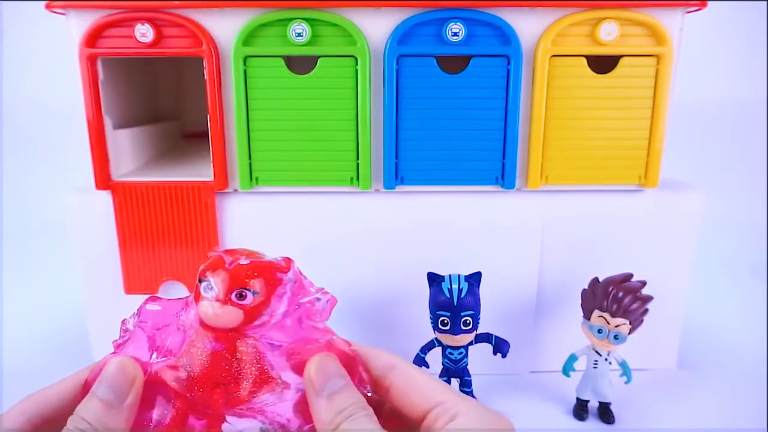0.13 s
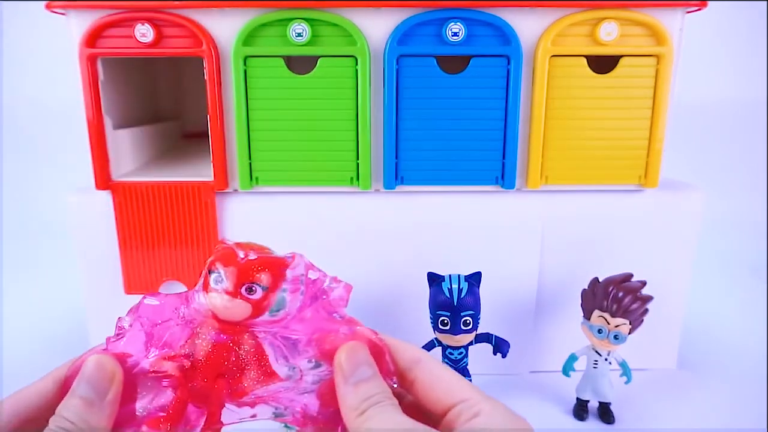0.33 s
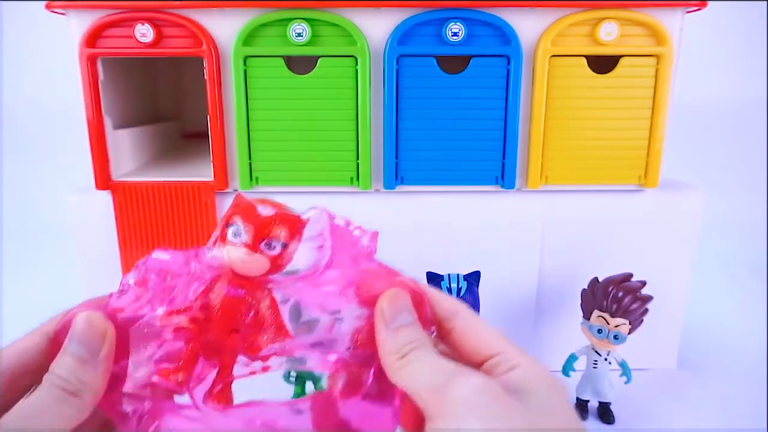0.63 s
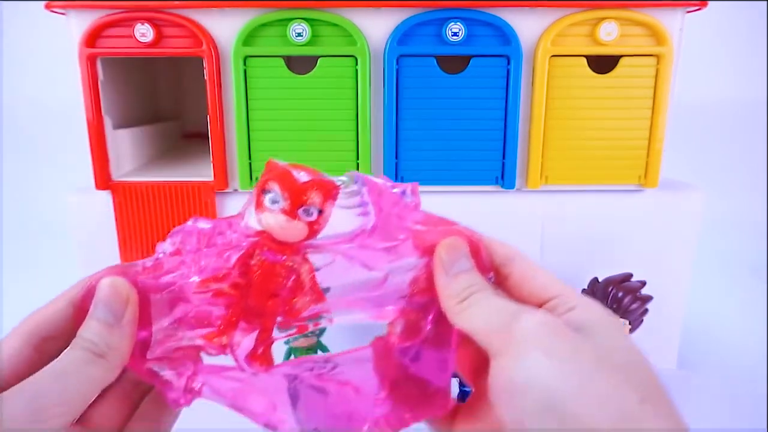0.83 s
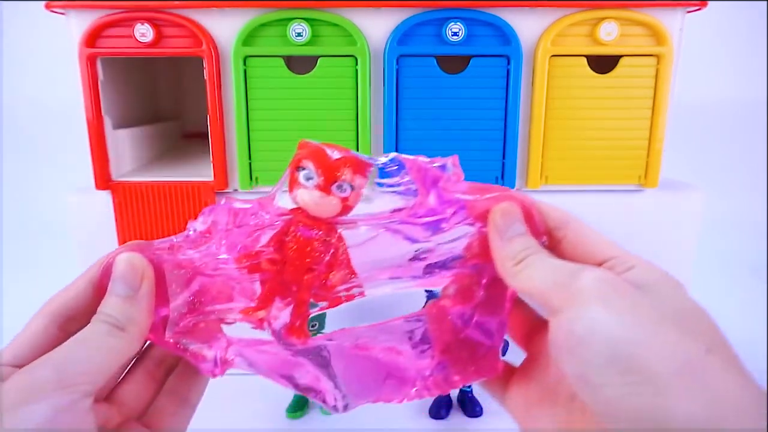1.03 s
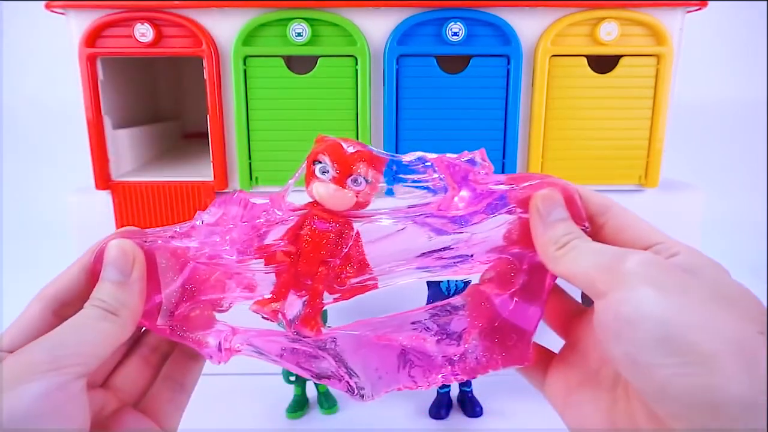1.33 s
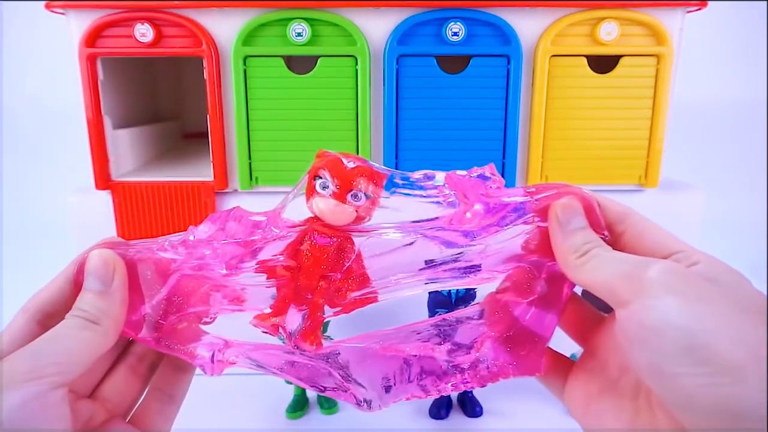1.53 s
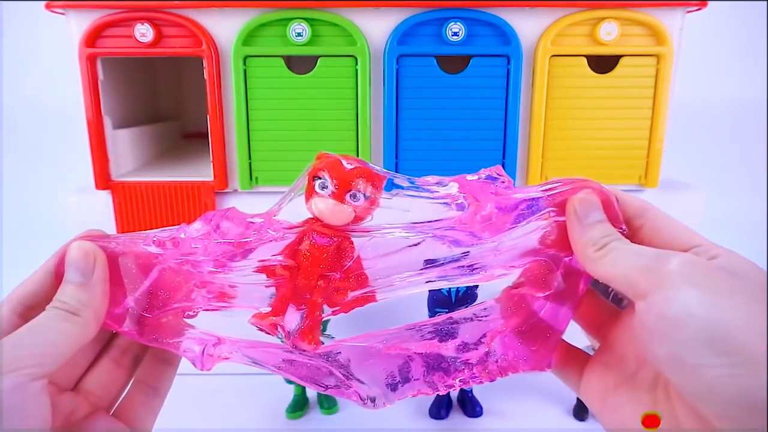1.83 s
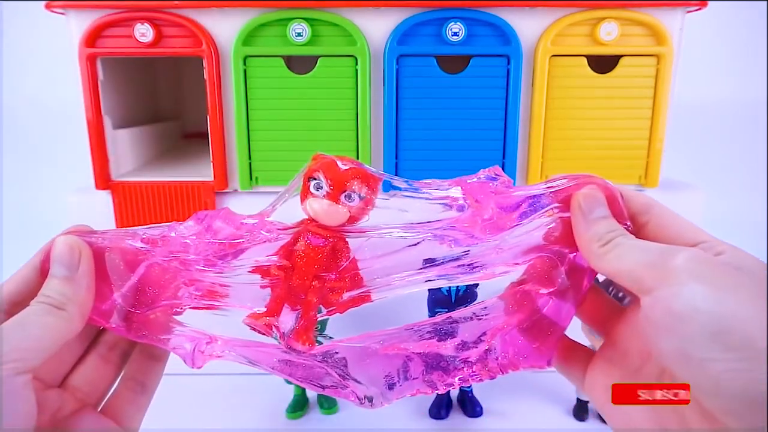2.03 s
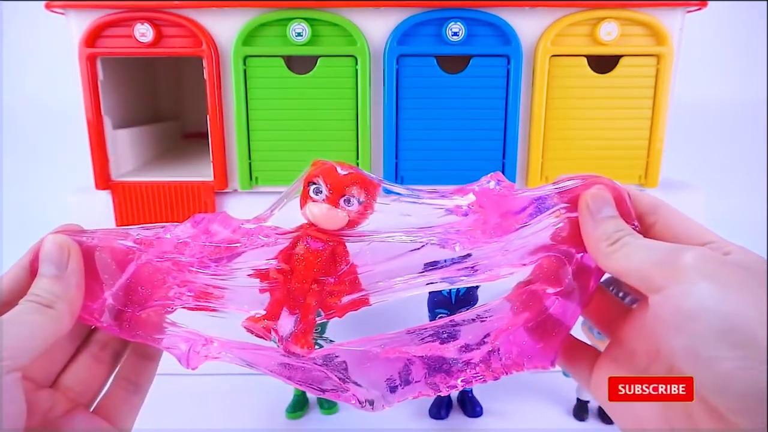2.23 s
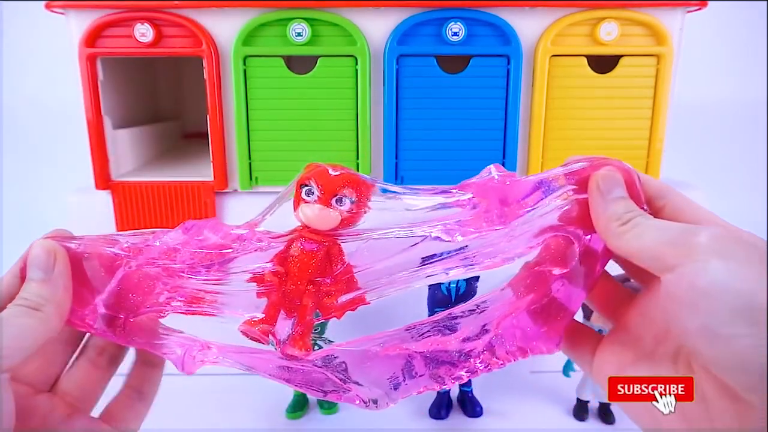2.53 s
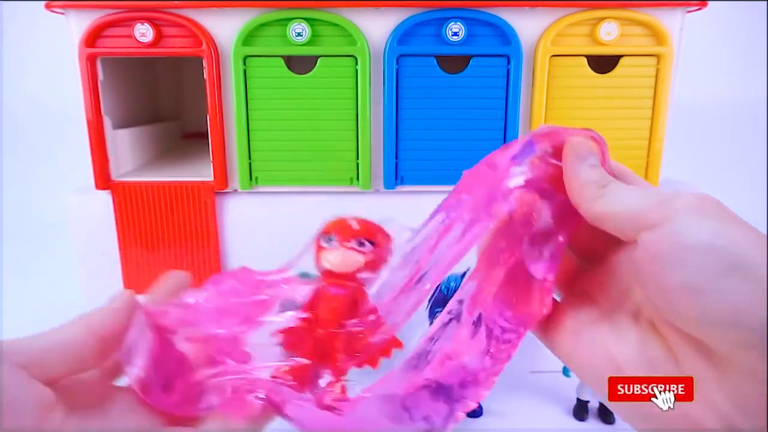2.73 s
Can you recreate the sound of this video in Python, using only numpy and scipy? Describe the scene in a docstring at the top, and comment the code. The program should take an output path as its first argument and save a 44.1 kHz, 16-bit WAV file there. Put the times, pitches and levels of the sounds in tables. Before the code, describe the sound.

Sticky slime squeezed and stretched by hand, with wet crackles, pops and squelches.

```python
"""Hands squeeze and stretch sticky slime close to a stereo microphone, in a quiet room that rumbles and
throbs below hearing. First thin films snap, trapped air hisses out through wet slits and fingers come
unstuck with tiny puffs. Then air pockets burst with a plop and the slime squelches, hardest near 1.4 s.
The sound drops out for a tenth of a second at 1.66 s. More squelching and plops follow, then a thin
whistle and the last snaps and hisses. The loudest pops clip."""
import sys
import numpy as np
from scipy import signal
from scipy.fft import rfft, irfft, next_fast_len
from scipy.io import wavfile
from scipy.ndimage import map_coordinates

SR = 44100
rng = np.random.default_rng(int(sys.argv[2]) if len(sys.argv) > 2 else 0)


def inscribe(sig):
    """Save sig as 16-bit PCM at rate SR to the path in sys.argv[1].

    A 1-D sig is mono; a 2-D sig holds one channel per row.
    Samples are clipped to [-1, 1] before scaling.
    """
    pcm = np.round(np.clip(np.atleast_2d(sig).T, -1, 1) * 32767)
    wavfile.write(sys.argv[1], SR, pcm.astype(np.int16))


N = 127890
TIME = np.arange(N) / SR
SHORT_TIME = TIME[:SR // 4]  # a quarter-second clock for single short sounds


def amp(db):
    """Turn decibels into a number to multiply by."""
    return 10 ** (np.asarray(db) / 20)


def unit(x):
    """Scale a sound to an average (rms) strength of 1."""
    return x / np.sqrt(np.mean(x ** 2) + 1e-20)


def along(points, hz):
    """Read between (frequency, value) points on a log frequency scale."""
    f, values = np.transpose(points)
    return np.interp(np.log(hz + 1), np.log(f + 1), values)


def curves(rows):
    """Join timed rows with straight lines, a curve per column; outside them -120 (silence in dB)."""
    times, *columns = np.transpose(rows)
    return [np.interp(TIME, times, column, -120, -120) for column in columns]


def wobble(rate):
    """A smooth curve through `rate` random values a second."""
    return map_coordinates(rng.standard_normal(int(N * rate / SR) + 4), [TIME * rate])


def filtered(x, response):
    """Multiply each frequency f in a sound by response(f)."""
    size = next_fast_len(x.shape[-1] + 8192)
    return irfft(rfft(x, size) * response(np.fft.rfftfreq(size, 1 / SR)), size)[..., :x.shape[-1]]


def ringing(f, rings):
    """How something that rings answers frequency f; each ring is (f/Hz, width/Hz, level/dB)."""
    return sum((-1) ** k * amp(db) * 1j * f * width / (hz * hz - f * f + 1j * f * width)
               for k, (hz, width, db) in enumerate(rings))


def noise(colour, likeness):
    """Stereo noise shaped by colour(f); likeness rows are (f/Hz, 0 to 1), where 1 makes left = right."""
    def response(f):
        angle = np.arccos(along(likeness, f)) / 2
        return colour(f) * [np.cos(angle), np.sin(angle)]
    mid, side = filtered(rng.standard_normal((2, N)), response)
    return unit(np.array([mid + side, mid - side]))


def add(out, start, sound, pan_db=0):
    """Mix a sound in at `start` seconds, pan_db louder on the left than on the right."""
    place = out[:, round(start * SR):][:, :sound.shape[-1]]
    place += amp([[pan_db / 2], [-pan_db / 2]]) * sound[..., :place.shape[-1]]


# The room's noise, from bass to treble: f/Hz, relative level/dB
ROOM_COLOUR = [(12, -29), (20, -0.5), (120, -16.5), (248, -23.5), (422, -27), (738, -31.5), (2320, -42),
               (5530, -45.5), (16000, -52)]
# How alike that noise is left and right: f/Hz, likeness/0 to 1
ROOM_LIKENESS = [(60, 0.19), (240, 0.18), (950, 0.23), (3770, 0.22), (15000, 0.11)]
# Faint high tones: f/Hz, level/dB
ROOM_TONES = [(5733, -69.5), (7644, -67)]

def room():
    """The room rumbles and hisses softly, with a sway too low to hear and two wavering tones."""
    rumble = noise(lambda f: amp(along(ROOM_COLOUR, f)) * (f > 20), ROOM_LIKENESS)
    sway = noise(lambda f: (f > 4) * (f < 20), [(10, 0.19)])
    tones = sum(amp(db + 3.8 * wobble(21)) * np.sin(2 * np.pi * hz * TIME) for hz, db in ROOM_TONES)
    return amp(-34) * rumble + amp(-38) * sway + tones


# Snapping films: t/s, peak level/dB, main ring f/Hz, other rings' gain/dB, time to fade 60 dB/s
FILM_SNAPS = [(0.0518, -6.5, 15400, -15.5, 0.0051), (0.088, -8.5, 3620, -17.5, 0.0039),
              (0.131, -21, 15900, -2, 0.005), (0.199, -22.5, 3400, -27, 0.0065),
              (0.2198, -5, 3450, -31.5, 0.0065), (0.351, -19, 12200, -13.5, 0.0065),
              (0.3743, -13, 3410, -20, 0.0071), (0.5365, -20, 3270, -13.5, 0.0089),
              (0.5535, -26, 3300, 6, 0.0041), (0.5692, -22.5, 3320.0, -20, 0.0071),
              (0.627, -15, 8100, -9, 0.011), (0.6323, -15.5, 3930, -3, 0.0076),
              (0.6539, -22, 9700, -24, 0.0094), (0.6605, -13, 9360, -21.5, 0.006),
              (0.6616, -17.5, 3140, -21, 0.0094), (0.7044, -16.5, 4370, -19, 0.0078),
              (0.7106, -15.5, 9700, -18, 0.0095), (0.757, -18.5, 9700, -30, 0.011),
              (0.7794, -7, 3270, -17.5, 0.028), (0.827, -23, 6600, -10, 0.007),
              (0.848, -10.5, 3270, -22, 0.015), (0.857, -18, 6500, -13, 0.007),
              (0.8779, -2.5, 8360, -27.5, 0.0094), (0.8956, -5, 10700, 6, 0.0081),
              (0.938, -22, 9730.0, 4, 0.0065), (0.957, -14, 13000, -7, 0.0077),
              (0.9673, -4, 6230, -1.5, 0.0058), (0.974, -7.5, 4000, -7, 0.0054),
              (0.9816, -4, 8500, -8, 0.01), (1.0107, -10.5, 4070, -9, 0.0065),
              (1.0326, -14, 4420, -15, 0.0036), (1.05, -20.5, 11000, -11, 0.0065),
              (1.0572, -11, 4330, -2, 0.0086), (1.0656, -10.5, 5750, 1, 0.0072),
              (1.0698, -7.5, 4230, 8.5, 0.0089), (1.1073, -8, 7100, -11.5, 0.0054),
              (1.1181, -7, 9350, -9.5, 0.0085), (1.1276, -18, 6030.0, 8.5, 0.0065),
              (1.1464, -1, 9850, 0, 0.0069), (1.155, -6.5, 9700, -2.5, 0.0058),
              (1.174, -4.5, 4400, -8.5, 0.0065), (1.1808, -16, 9250, -4.5, 0.0065),
              (1.202, 0, 5850, -7, 0.0038), (1.213, -13, 9700, 2, 0.0065),
              (1.2297, -8.5, 4150, -18, 0.0065), (1.235, -15, 4550, -11, 0.011),
              (1.2426, -15, 9500, -21, 0.0065), (1.255, -8, 8700, -12, 0.0075),
              (1.2639, 0.5, 8400, 2.5, 0.0071), (1.278, -16.5, 9400, -10, 0.0065),
              (1.2855, -1, 8700, -10.5, 0.0065), (1.2905, 2, 8870, -30, 0.0044),
              (1.319, 0.5, 11400, -16.5, 0.0057), (1.3304, -3.5, 7030, -4, 0.013),
              (1.3379, -1, 7230, -8, 0.0097), (1.345, -6.5, 6750, -5, 0.0065),
              (1.363, -9.5, 5610, -7, 0.0049), (1.4, -9, 11370.0, -7.5, 0.0065),
              (1.4225, -1.5, 11710.0, -4, 0.0065), (1.455, -13, 11530, -13.5, 0.0097),
              (1.4595, -10.5, 14510.0, -0.5, 0.0065), (1.4919, -6, 10600, -1, 0.0059),
              (1.498, -4.5, 4160, -12, 0.017), (2.0108, 2.5, 4460, -18, 0.0079),
              (2.054, -12, 2610, -24.5, 0.0057), (2.1888, -12.5, 10100, 5.5, 0.0053),
              (2.1915, -12, 5160, -11, 0.0079), (2.283, -27, 10600, -3, 0.0058),
              (2.37, -29, 3700, -16, 0.0038), (2.402, -35, 5800, -12.5, 0.005),
              (2.417, -16, 6740, -6.5, 0.005), (2.4314, -23, 14990.0, -11, 0.0065),
              (2.4482, -14, 14300, -11, 0.0054), (2.452, -2, 8380, -14.5, 0.0052),
              (2.4748, -27, 2680, -14, 0.0055), (2.479, -18, 10000, -13, 0.007),
              (2.484, 0.5, 9550, -14.5, 0.0088), (2.4898, -6.5, 3460, 1, 0.0065),
              (2.5173, -15, 10400, -3, 0.0052), (2.55, -21, 11630.0, -2.5, 0.007),
              (2.5734, -6, 11800, -11, 0.007), (2.576, -9, 4970, -8.5, 0.006)]

def film_snaps(rise_s=0.0002):
    """A film tears: a flick of noise rings the hollow behind it, with two random rings and a crack."""
    out, t = np.zeros((2, N)), TIME[:2048]
    for start, db, hz, others_db, fade_s in FILM_SNAPS:
        fade_db = -60 * t / fade_s
        spike = amp(8.5 + fade_db / 0.37)  # a stronger, shorter kick at the start
        shape = (amp(fade_db) + spike) * (1 - np.exp(-t / rise_s))
        mid, side = rng.standard_normal((2, len(t))) * shape
        flick = mid + 0.12 * side * [[1], [-1]]
        low, high = rng.uniform(3000, 7000), rng.uniform(7000, 13000)
        others_db = min(others_db, 6)
        crack = (9000, 12000, others_db - 13.5)
        others = [(low, 0.57 * low, others_db), crack, (high, 0.31 * high, others_db)]
        snap = filtered(flick, lambda f: ringing(f, [(hz, 0.3 * hz, 0)]) ** 2 + ringing(f, others))
        add(out, start - rise_s, amp(db) * snap / np.abs(snap).max())
    return out


# Escaping air, one list per burst: t/s, slit level/dB, fizz level/dB
AIR_BURSTS = [
    [(.06, -48.5, -74), (.09, -35.5, -64), (.14, -58, -70.5)],
    [(.199, -36, -50), (.27, -26, -35), (.33, -28.5, -38.5), (.41, -34, -41), (.492, -42, -41)],
    [(.52, -53, -65.5), (.553, -45, -60), (.59, -53.5, -57), (.64, -46.5, -45), (.74, -44.5, -38.5),
     (.8, -33, -35), (.885, -26, -27), (.915, -33.5, -30), (.95, -46, -49)],
    [(.95, -36.5, -54), (1.0, -33.5, -60), (1.07, -44.5, -65), (1.1, -35, -57), (1.19, -38, -54),
     (1.26, -24, -29), (1.3, -37, -41), (1.34, -32, -25.5), (1.385, -36, -38.5), (1.4, -50, -34)],
    [(1.4, -42.5, -38.5), (1.42, -34, -18.5), (1.45, -41, -42.5), (1.5, -28.5, -25.5), (1.545, -33, -38.5),
     (1.57, -47.5, -49), (1.65, -63.5, -64)],
    [(1.875, -54.5, -55), (1.935, -38, -43.5), (2.01, -48.5, -58)],
    [(2.01, -26.5, -38), (2.066, -32.5, -40), (2.13, -41.5, -45), (2.17, -53, -75)],
    [(2.18, -43, -52.5), (2.22, -50, -57), (2.3, -69, -57)],
    [(2.39, -50, -67), (2.45, -47, -42), (2.47, -41, -38), (2.49, -28, -35), (2.535, -50, -46),
     (2.578, -44, -36.5), (2.61, -50, -49), (2.67, -66, -64)],
]
# Each burst's slit, one list each: main ring f/Hz, looseness/times wider, other rings' gain/dB
SLIT_PITCH = [3480, 3450, 3290, 4230, 3760, 3600, 4130, 4480, 3660]
SLIT_LOOSENESS = [1.5, 1.1, 1.3, 12, 4.5, 3.1, 1.7, 2, 7.1]
SLIT_OTHERS_DB = [-1.5, -2.5, -2, -17, -13, -0.5, 2, 1, 1.5]
# The rings of any slit: pitch/main pitch, width before loosening/main pitch, relative level/dB
SLIT_RINGS = [(.65, .25, -14), (1.0, .17, 0), (1.36, .17, -6), (1.83, .17, -8), (2.7, .25, -9)]
# The fine fizz, from bass to treble: f/Hz, relative level/dB
FIZZ_COLOUR = [(1760, -43), (3000, -2), (4230, -14), (5250, -13.5), (9730, -14.5), (13700, -15),
               (15100, -5.5), (16000, -23)]
# Each burst's bright ring in the fizz, one list each: f/Hz, strength/dB
FIZZ_PITCH = [9000, 8100, 10020, 9600, 9560, 7840, 8200, 10000, 10600]
FIZZ_BOOST_DB = [15, 16, 26, 20, 14, 6.1, 21, 14, 11]

def escaping_air(flutter_db=2.5):
    """Air squeezes through wet slits that ring; its hiss flutters, fizzes and crackles."""
    hiss, fizz_level, likeness = 0, 0, [(3000, 0.96)]
    bursts = zip(AIR_BURSTS, SLIT_PITCH, SLIT_LOOSENESS, SLIT_OTHERS_DB, FIZZ_PITCH, FIZZ_BOOST_DB)
    for rows, hz, looseness, others_db, fizz_hz, boost_db in bursts:
        def slit(f):
            return sum(amp(db + others_db * (ratio != 1))
                       * np.abs(ringing(f, [(hz * ratio, hz * width * looseness, 0)])) ** 2
                       for ratio, width, db in SLIT_RINGS)

        def fizz(f):
            ring = np.abs(ringing(f, [(fizz_hz, 0.3 * fizz_hz, 0)])) ** 2
            return amp(along(FIZZ_COLOUR, f)) * (1 + amp(boost_db) * ring)

        slit_level, burst_fizz = amp(curves(rows))
        hiss += slit_level * noise(slit, likeness) + burst_fizz * noise(fizz, likeness)
        fizz_level += burst_fizz
    return amp(flutter_db * wobble(240)) * hiss + fizz_level * bubble_crackle()


def bubble_crackle(ticks_per_s=700):
    """Tiny bubbles pop at random moments, each a bright ringing tick."""
    size_db = np.minimum(rng.exponential(size=N), 3)
    ticks = (rng.random(N) < ticks_per_s / SR) * rng.choice([-1, 1], N) * amp(size_db)
    crackle = filtered(ticks, lambda f: ringing(f, [(4080, 3000, -2.5), (10100, 1500, 11.0)]))
    return amp(-17.5) * unit(crackle)


# Puffs of air: t/s, peak level/dB, width/s; some fall with film snaps and give them a low body
PUFFS = [(0.0878, -10, 0.000032), (0.2203, -3.5, 0.00003), (0.3758, -23.5, 0.000088),
         (0.6628, -16.5, 0.000036), (.778, -10.5, 0.000043), (0.85, -11, 0.0001),
         (0.8596, -7, 0.000059), (0.87, -10.5, 0.000065), (0.8776, -7, 0.00024),
         (.8804, -3.5, 0.000049), (0.8952, -6, 0.00011), (0.9017, -13.5, 0.00026),
         (2.1926, -15.5, 0.000029), (2.369, -19.5, 0.00004)]

def puffs(lead_s=0.002):
    """A finger comes unstuck, or a film snaps: one sharp push of air, then a weaker, slower pull."""
    out, t = np.zeros((2, N)), SHORT_TIME - lead_s
    for when, db, width in PUFFS:
        push = np.exp(-0.5 * (t / width) ** 2)
        pull = np.exp(-0.5 * ((t - 4 * width) / (2 * width)) ** 2)
        add(out, when - lead_s, amp(db) * (push - 0.2 * pull))
    return out


def throb(first_s=0.229, every_s=0.3385, width_s=0.02, lead_s=0.1):
    """A regular beat too low to hear: the air pressure swings down and up, then sags a little."""
    t = (TIME - first_s + lead_s) % every_s - lead_s  # time from the middle of each beat
    swing = t / width_s * np.exp(-0.5 * (t / width_s) ** 2)
    sag = np.exp(-0.5 * ((t - 0.095) / 0.03) ** 2)
    return (amp(-14.5) * swing - amp(-28) * sag) * (TIME > first_s - lead_s)


# Bursting air pockets: t/s, level/dB, starting f/Hz, time to fade 60 dB/s
POCKET_PLOPS = [(.5515, -14.5, 3180, 0.02), (0.977, -18.5, 895, 0.017), (1.028, -26, 653, 0.032),
                (1.171, -23.5, 750, 0.022), (1.2, -16, 726, 0.008), (1.288, -20, 900, 0.012),
                (1.362, -31, 997, 0.049), (1.406, 2, 382, 0.03), (1.409, 11.5, 1130, 0.014),
                (1.4073, -6, 1580, 0.016), (1.438, -14.5, 1154, 0.042), (1.472, 3, 653, 0.016),
                (1.504, -11, 1410, 0.016), (1.926, -12.5, 711, 0.035), (1.9365, 2, 499, 0.029),
                (1.9365, -5.5, 315, 0.04), (2.0115, 2, 1400, 0.0045), (2.011, -6.5, 2640, 0.012)]

def pocket_plops(rise_per_s=5.2, attack_cycles=0.53):
    """An air pocket bursts and rings like a bubble, its pitch rising as it fades."""
    out, t = np.zeros((2, N)), SHORT_TIME
    for start, db, hz, fade_s in POCKET_PLOPS:
        tone = np.sin(2 * np.pi * hz * (t + rise_per_s * t * t / 2))
        attack = 1 - np.exp(-t * hz / attack_cycles)
        add(out, start, amp(db - 60 * t / fade_s) * attack * tone)
    return out


# Squelches, one list each: t/s, level/dB
SQUELCHES = [
    [(.76, -70), (.78, -42), (.82, -49), (.85, -39), (.898, -27.5), (.92, -36), (.982, -43), (1.06, -54)],
    [(1.4, -59), (1.41, -12.5), (1.43, -22.5), (1.462, -30), (1.474, -25), (1.53, -20), (1.56, -34),
     (1.64, -60.5)],
    [(1.86, -64), (1.875, -43), (1.915, -21), (1.942, -17.5), (1.96, -23), (2.05, -30.5), (2.22, -49.5)],
]
# The slime's rings, one list per squelch: f/Hz, width/Hz, relative level/dB
SLIME_RINGS = [
    [(304, 64, -21.5), (514, 90, -20.5), (696, 150, -20)],
    [(398, 96, -9.5), (735, 90, -8), (1114, 55, 0), (2170, 150, -6)],
    [(349, 63, -2), (518, 32, 3), (680, 36, 4.5), (1420, 360, -16)],
]
# The slime's noise, from bass to treble: f/Hz, relative level/dB
SLIME_COLOUR = [(71, -62), (120, -20.5), (531, -15), (882, -23), (2500, -30), (3250, -64.5), (5500, -120)]

def squelches():
    """Squeezed slime makes low, wet noise in uneven lumps that ring inside it."""
    out = 0
    for rows, rings in zip(SQUELCHES, SLIME_RINGS):
        def colour(f):
            return amp(along(SLIME_COLOUR, f)) * (f > 110) * (0.25 + np.abs(ringing(f, rings)))

        lumps = amp(0.77 * wobble(120))
        out += amp(curves(rows)[0]) * unit(lumps * noise(colour, likeness=[(500, 0.84)]))
    return out


# Slow pushes of air: t/s, level/dB, f/Hz, left minus right/dB
AIR_PUSHES = [(0.892, -16, 60, 3), (1.269, -17.5, 60, -3), (1.4039, -5, 46, -8), (1.48, -8.5, 62, 5.5),
              (1.538, -15.5, 45.5, -7), (1.928, -10, 40.1, 7.5), (2.011, -17.5, 70.4, -1),
              (2.478, -23.5, 60.4, -3)]

def air_pushes(fade_cycles=4.3):
    """A slow push of air makes a deep thump that dies away in a few swings."""
    out, t = np.zeros((2, N)), SHORT_TIME
    for start, db, hz, pan_db in AIR_PUSHES:
        level = amp(db - 60 * t * hz / fade_cycles)
        add(out, start, -level * np.sin(2 * np.pi * hz * t), pan_db)
    return out


# The path of the whistle: t/s, f/Hz, level/dB
PINHOLE_WHISTLE = [(2.196, 14870, -65), (2.214, 14080, -53), (2.237, 14600, -54), (2.255, 13420, -66)]

def pinhole_whistle():
    """Air slips through a pinhole with a thin, very high, sliding tone."""
    hz, db = curves(PINHOLE_WHISTLE)
    return np.sqrt(2) * amp(db) * np.sin(2 * np.pi * np.cumsum(hz) / SR)


def scene(tail_fade_s=0.039):
    """All the sounds together; snaps, puffs, plops and pushes get a short echo without bass."""
    pops = film_snaps() + puffs() + pocket_plops() + air_pushes()
    t = TIME[:SR // 6]
    tail = rng.standard_normal((1, len(t))) * amp(-60 * t / tail_fade_s)
    echo = signal.fftconvolve(pops, tail / np.linalg.norm(tail), axes=1)[:, :N]
    echo = amp(-6.5) * filtered(echo, lambda f: f > 300)
    return room() + pops + echo + escaping_air() + throb() + squelches() + pinhole_whistle()


def record(dry, gap_s=(1.6567, 1.755), top_hz=16000):
    """The loudest peaks are clipped, the sound drops out briefly and the highest treble is cut."""
    sound_on = (TIME < gap_s[0]) | (TIME > gap_s[1])
    clipped = np.clip(dry, -1, 1)
    return filtered(clipped * sound_on, lambda f: np.clip((top_hz - f) / 500 + 0.5, 0, 1) ** 2)


dry = scene()
out = record(dry)
inscribe(out)
```